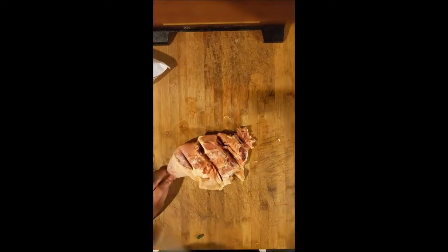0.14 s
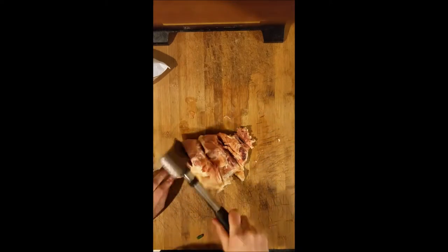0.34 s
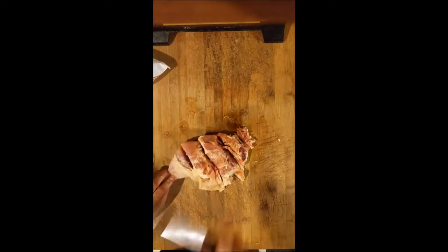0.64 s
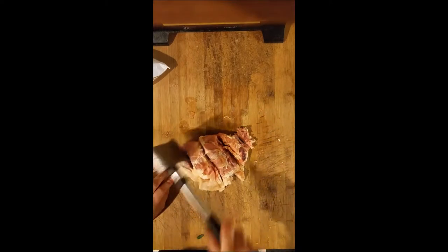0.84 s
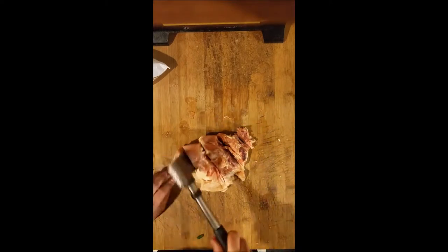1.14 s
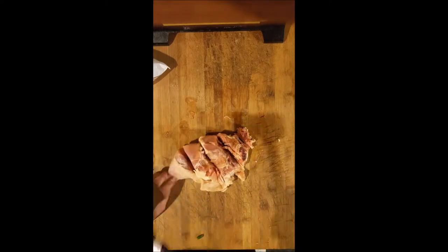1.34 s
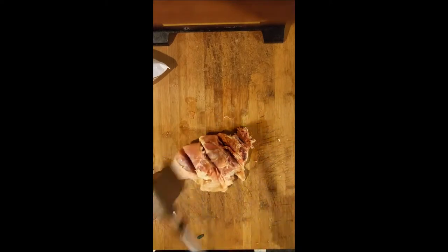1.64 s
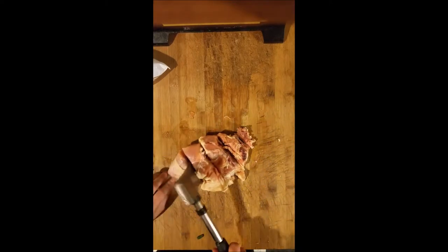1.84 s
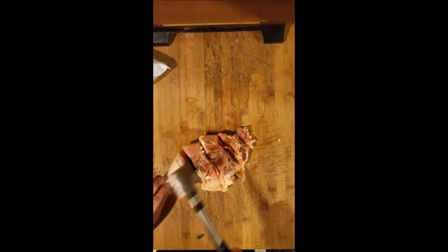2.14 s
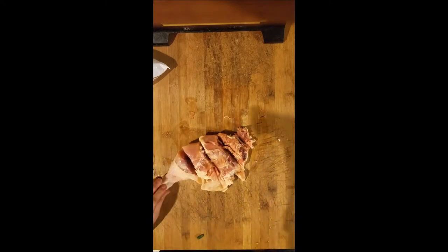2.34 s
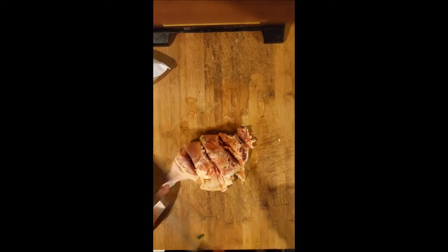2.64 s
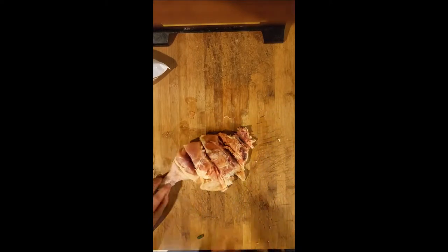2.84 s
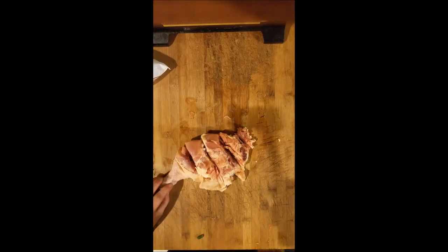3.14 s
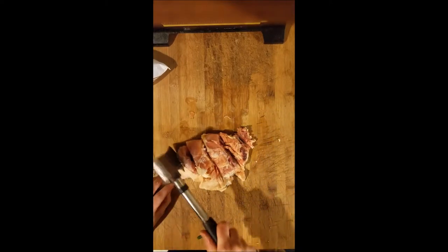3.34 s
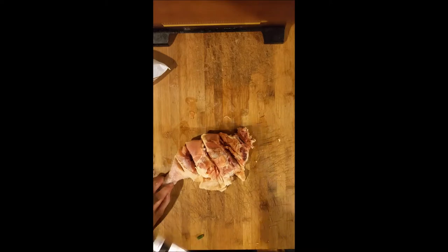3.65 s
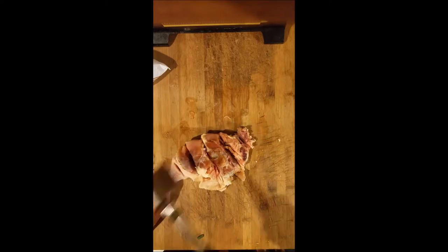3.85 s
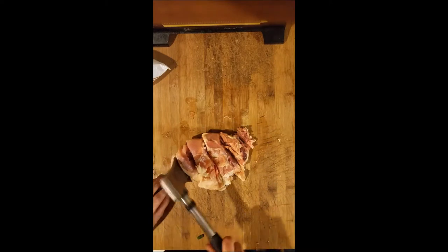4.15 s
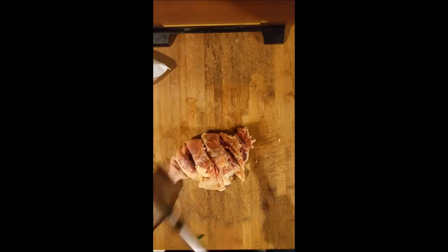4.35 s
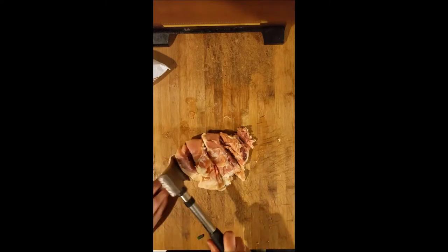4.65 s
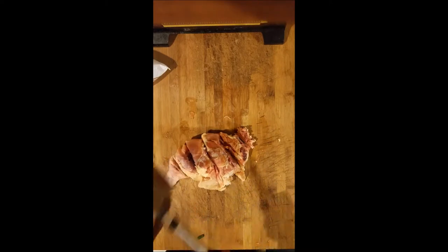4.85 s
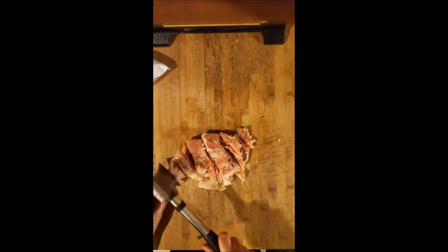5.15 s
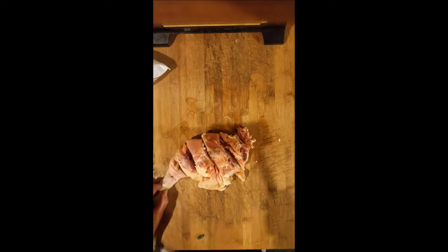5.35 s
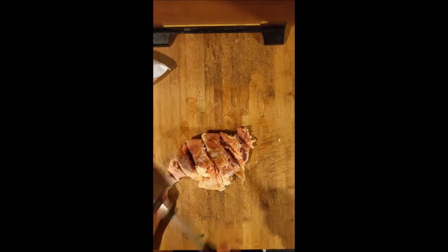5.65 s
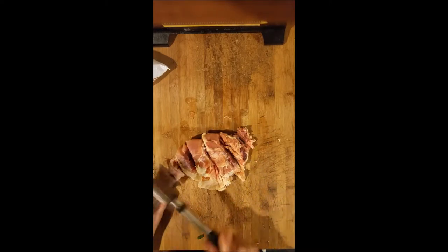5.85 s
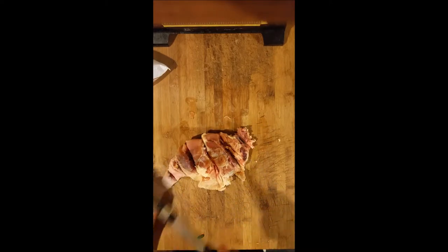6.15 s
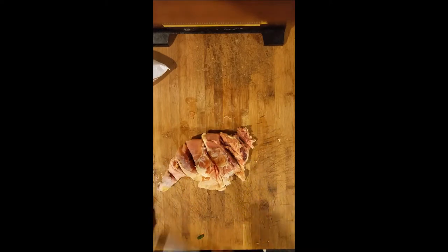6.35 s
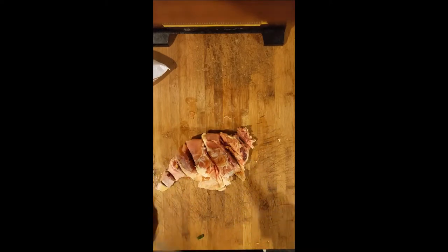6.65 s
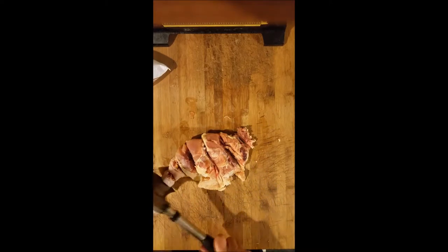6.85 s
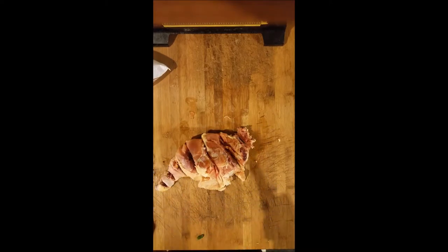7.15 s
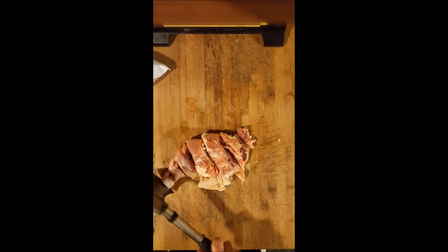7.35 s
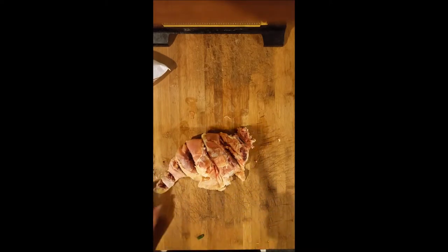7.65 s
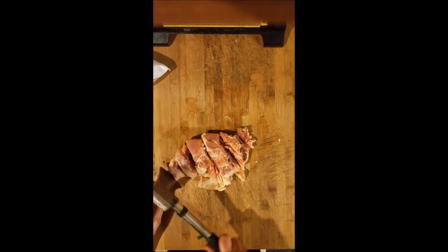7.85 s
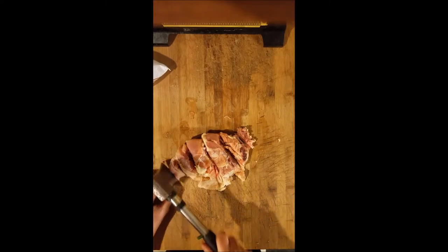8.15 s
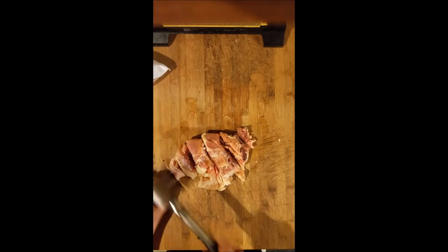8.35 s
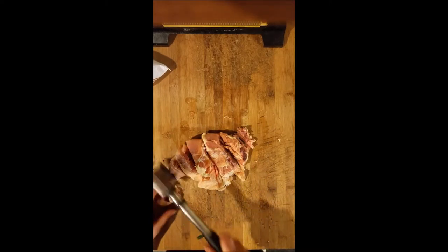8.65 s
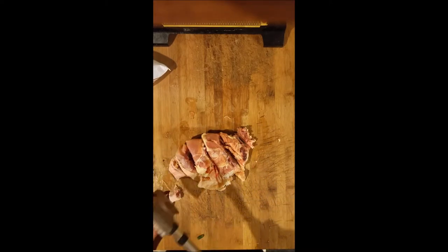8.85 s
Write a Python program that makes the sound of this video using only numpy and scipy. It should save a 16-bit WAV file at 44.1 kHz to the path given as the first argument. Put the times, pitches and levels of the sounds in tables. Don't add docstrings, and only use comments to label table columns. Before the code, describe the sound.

Close stereo pickup in a small, lively kitchen. The tail of one chop dies away, then eighteen uneven chops follow through flesh and bone on a butcher block: solid mid-low wooden thunks, steel slap, occasional sharp bone crack, sticky flesh noise. The block rocks softly between some blows and meat slides faintly. The chopping stops just before eight seconds, leaving tiny ticks, three short edge scrapes and a soft hum.

```python
import sys
import numpy as np
from scipy import signal
from scipy.fft import rfft, irfft, next_fast_len
from scipy.io import wavfile
from scipy.ndimage import uniform_filter1d

SR = 44100
rng = np.random.default_rng(int(sys.argv[2]) if len(sys.argv) > 2 else 0)


def volts_from_decibels(level):
    exponent = np.asarray(level, float) / 20
    return 10 ** exponent


def store_pcm(level_fs):
    pcm = np.round(np.clip(level_fs, -1, 1) * 32767).astype(np.int16)
    wavfile.write(sys.argv[1], SR, np.atleast_2d(pcm).T)


N = 397339
PAD = SR // 10
EDGES_HZ = 30 * 2 ** np.arange(0, 9.6, .5)
BALANCE_DB = np.array([[-.7], [.7]])

# t/s, block level/dB, upper body rel/dB, slap rel/dB, crunch length/ms
BLOWS = [(-0.048, -12.5, -4.5, -19, 1.9), (0.344, -7.5, 0, -17.5, 4), (0.724, -2, -6.5, -31.5, 9),
         (1.114, -43, 4.5, -1.5, 5.3), (1.495, -2.5, -6, -34, 12.5), (1.863, -6, -3.5, -41, 6.1),
         (2.531, -17, -2.5, -18, 40), (2.905, -7.5, -0.5, -12.5, 4), (3.287, -0.5, -1, -31.5, 7.6),
         (3.744, -14.5, 0.5, -17.5, 5.1), (4.119, -6, -1.5, -22, 3.9), (4.525, -4, 0, -24, 9.4),
         (5.088, -25.5, -0.5, -15.5, 7), (5.507, -8.5, -1.5, -22.5, 6.1), (5.863, -5.5, -1.5, -24, 5.3),
         (6.416, -26.5, 1.5, -16.5, 2.7), (6.857, -10.5, 0, -20.5, 14.6), (7.323, -9.5, 6, -32.5, 8.4),
         (7.829, -9.5, 3, -35, 2.9)]
# t/s, bone crack level/dB, counter thump level/dB, grinding rel/dB
CUTS = [(-.065, -53, -31.5, -11), (0.3401, -12, -23.5, -7), (0.7213, -23, -28, -9),
        (1.1099, -50, -50, -1.5), (1.4914, -48.5, -30, -14), (1.8577, -43, -35, -13.5),
        (2.5223, -39, -31.5, 0.5), (2.9052, -30, -23, -4.5), (3.2828, -44.5, -25.5, -10),
        (3.7398, -20, -30.5, -12.5), (4.1083, -13.5, -23.5, -12.5), (4.5247, -32.5, -28, -6.5),
        (5.0857, -28.5, -34, -0.5), (5.4955, -36, -24, 1.5), (5.8623, -22.5, -27.5, -7.5),
        (6.4137, -26.5, -42, -6.5), (6.8533, -22, -23.5, 2), (7.322, -27, -26, -1),
        (7.8258, -37, -31, -11.5)]
# f/Hz, level/dB, t60/s
BLOCK_LOW = [(384.8, -20, 0.015), (515.5, 0, 0.041), (549.5, -1.5, 0.041), (622.4, -5, 0.028),
             (577.7, -0.5, 0.048), (722, -2.5, 0.031), (725, -8.5, 0.032), (829.7, 3, 0.03)]
BLOCK_HIGH = [(958, -9.5, 0.047), (1165, 11.5, 0.0071), (1060, -6.5, 0.036), (1238, -8, 0.029),
              (1635, 1, 0.03), (1627, -3.5, 0.034), (1751, 1.5, 0.016), (2080, 1.5, 0.011),
              (2137, -7.5, 0.017), (2354, -3, 0.0061), (3016, 0, 0.0022)]
# f/Hz, density/dB per Hz
KNOCK_COLOUR = [(500, -30), (1300, -8), (2400, -1), (3300, 1), (4500, -4), (6400, -11), (9000, -22),
                (16000, -26)]
# f/Hz, density/dB per Hz
CRACK_COLOUR = [(300, -12), (1000, 2), (3500, 1), (6400, 0), (9500, -4), (12500, -3), (16000, -3)]
# f/Hz, level/dB, t60/s
COUNTER = [(66, -6.5, 0.51), (97.5, 4.5, 0.26), (162.4, 5.5, 0.15), (193.7, -3.5, 0.24), (270.6, 7, 0.025),
           (334, -10.5, 0.093)]
# t/s, hold/s, level/dB
SQUELCHES = [(0.0, 0.052, -59), (.35, 0.078, -44.5), (.73, 0.045, -40.5), (1.12, 0.026, -59),
             (1.5, .12, -52), (1.87, 0.034, -47.5), (2.54, .07, -48.5), (2.91, 0.11, -48.5),
             (3.29, 0.073, -40), (3.75, 0.025, -44), (4.125, 0.062, -43), (4.53, 0.066, -41.5),
             (5.09, 0.082, -51.5), (5.51, .08, -42.5), (5.87, 0.038, -36.5), (6.42, .04, -57),
             (6.86, 0.067, -43), (7.33, 0.058, -42.5), (7.835, 0.052, -46)]
# f/Hz, density/dB per Hz
SQUELCH_COLOUR = [(1200, -28), (2600, -4.5), (4000, -4), (8000, -15), (12500, -16), (16000, -14)]
# f/Hz, level/dB, t60/s
HEAD_LOW = [(2143, -8, .2)]
HEAD_HIGH = [(12320, -1, .13)]
# t/s, ring level/dB
LOW_RINGS = [(0.7218, -31), (2.9038, -26.5), (3.2854, -29), (3.7414, -41), (5.5034, -11.5), (5.8626, -18),
             (6.8553, -20.5), (7.8274, -34.5)]
HIGH_RINGS = [(0.7324, -49), (3.2929, -46), (5.8751, -44)]
# t/s, peak level/dB, length/ms
TICKS = [(0.1716, -62, 4), (0.2553, -59, 4.8), (0.297, -44.5, 2.2), (0.5994, -49.5, 2.1),
         (1.1137, -27.5, 3.5), (1.4847, -30, 1.2), (1.7274, -59, 2.5), (1.8544, -38, 4.7),
         (2.3316, -42, 1.3), (2.516, -27, 5.6), (2.9464, -35, 1.7), (3.2771, -24, 3.9),
         (3.9609, -50.5, 0.82), (4.1464, -28.5, 3.7), (4.3194, -32, 1.6), (4.502, -39, 2.1),
         (4.8818, -38.5, 2.1), (5.2402, -30, 3.2), (5.5464, -22, 1.6), (5.557, -14.5, 2.1),
         (5.5775, -26, 4.6), (6.6662, -40, 1.2), (7.3123, -23, 2.1), (7.3534, -51, 1.7), (7.38, -19, 1.1),
         (7.6003, -61, 0.67), (8.1952, -32.5, 2.1), (8.5834, -34, 0.95)]
# t/s, hold/s, level/dB
SLIDES = [(0.17, 0.086, -60), (0.58, 0.25, -61), (1.405, 0.0834, -68.5), (2.335, 0.011, -53),
          (2.72, 0.11, -66), (3.965, 0.017, -48.5), (4.3, 0.22, -64), (4.89, 0.0091, -57.5),
          (5.3, 0.22, -72), (6.36, 0.013, -67.5), (6.67, 0.064, -68.5), (7.1, 0.17, -66.5), (7.6, 0.1, -80),
          (8.15, 0.6, -74), (8.92, 0.057, -70)]
# f/Hz, density/dB per Hz
SLIDE_COLOUR = [(530, -39.5), (1360, -20.5), (1510, 3.5), (1660, -18.5), (1830, -3), (2830, -6),
                (8500, -24), (16000, -22.5)]
# t/s, hold/s, level/dB
SCRAPES = [
    (8.235, 0.019, -57.5),
    (8.35, 0.076, -54),
    (8.53, 0.083, -56),
]
# f/Hz, width/Hz, level/dB
EDGE_MODES = [(660, 140, 17), (1655, 150, 22.5), (3650, 480, 11.5), (5190, 540, 1), (9580, 150, 6.5)]
# t/s, peak level/dB, f/Hz, length/ms
ROCKS = [(1.299, -62, 190, 54), (1.401, -64, 186, 22), (3.961, -37, 198.4, 46), (3.994, -50, 204, 30),
         (4.036, -37.5, 187.4, 20), (4.079, -35.5, 193, 28), (4.899, -61.5, 257, 13), (8.278, -48, 185, 14),
         (8.414, -44.5, 178, 9.6), (8.544, -52, 176, 14), (4.009, -44, 581, 23), (4.081, -35.5, 530, 21)]
# t/s, hold/s, level/dB
STIRRING = [(2.7, 0.155, -52), (5.3, .2, -58), (6.5, 0.53, -64.5), (7.1, 0.18, -54.5), (8.0, 1.1, -63)]
# f/Hz, density/dB per Hz
TONE_COLOUR = [(18, -35), (30, -7), (201, -13), (332, -23.5), (562, -10), (625, -15.5), (752, -13),
               (858, -18), (928, -15.5), (2280, -21), (4770, -43.5), (15200, -43), (16500, -54.5)]
# f/Hz, t60/s, level/dB
KITCHEN = [(51, 0.26, -11), (121, 0.32, 5.5), (382, 0.4, 3.5), (990, 0.48, -2), (2340, 0.37, 6.5),
           (6770, 0.48, 8), (15100, 0.13, 16)]
# f/Hz, correlation/1
LIKENESS = [(60, 1), (250, 0.58), (600, 0.59), (1200, -0.35), (3000, 0.23), (12000, -1)]
# f/Hz, lag/samples
RIGHT_LAG = [(100, 8), (520, 12), (1000, 12), (1460, 16), (2200, 21), (16000, 20)]
# delay/ms, level/dB
SURFACES = [
    [(1.3, -33), (3.1, -13)],
    [(.9, -15), (4.2, -13)],
]


def at_hz(points, hz, column=1):
    points = np.array(points)
    return np.interp(np.log(hz), np.log(points[:, 0]), points[:, column])


def add(track, s, sound):
    i = round(s * SR) + PAD
    track[..., i:i + sound.shape[-1]] += sound[..., :N + PAD - i]


def drift(knots_rate):
    knots = rng.standard_normal(int(knots_rate * 10) + 2)
    return np.interp(np.linspace(0, len(knots) - 1, N + PAD), np.arange(len(knots)), knots)


def ring(x, hz, t60_s):
    r = volts_from_decibels(-60 / (t60_s * SR))
    w = 2 * np.pi * hz / SR
    return signal.lfilter([0, np.sin(w)], [1, -2 * r * np.cos(w), r * r], x + 1e-18)


def body(forces, modes, vary_db):
    out = 0
    luck = rng.standard_normal((len(forces), len(modes)))
    for k, (hz, mode_db, t60_s) in enumerate(modes):
        track = np.zeros(N + PAD)
        for (s, force), chance in zip(forces, luck[:, k]):
            add(track, s, force * volts_from_decibels(mode_db + vary_db * chance))
        out = out + (-1) ** k * ring(track, hz, t60_s)
    return out


def crunch(ms, rise_ms, spread_db):
    t_ms = np.arange(4096) / SR * 1000
    burst = rng.standard_normal(4096) * volts_from_decibels(spread_db * rng.exponential(1, 4096))
    sizes = np.abs(burst) * (1 - np.exp(-t_ms / rise_ms)) * np.exp(-t_ms / np.clip(ms, .3, 30))
    for _ in range(5):
        phase = np.angle(rfft(sizes * np.sign(burst)))
        burst = sizes * np.sign(irfft(np.exp(1j * phase)))
    return burst / np.sqrt(np.sum(burst ** 2))


def coloured(x, spectrum):
    log_gain = np.log(volts_from_decibels(at_hz(spectrum, np.arange(1025) * SR / 2048 + 1)))
    cepstrum = irfft(log_gain)
    cepstrum[1:1024] *= 2
    cepstrum[1025:] = 0
    kernel = irfft(np.exp(rfft(cepstrum)))[:512]
    return signal.fftconvolve(x, kernel / np.sqrt(np.sum(kernel ** 2)))[:len(x)]


def strokes(rows, rise_db_per_s, fall_db_per_s):
    out = np.zeros(N + PAD)
    for s, hold_s, db in rows:
        t = np.arange(-PAD, 3 * PAD + max(hold_s, 0) * SR) / SR
        rise_db = rise_db_per_s * np.maximum(-t, 0)
        fall_db = fall_db_per_s * np.maximum(t - hold_s, 0)
        add(out, max(s - PAD / SR, -PAD / SR), volts_from_decibels(db - rise_db - fall_db))
    return out


def bands(gain, count):
    out = 0
    white = rng.standard_normal((2, 2, count))
    for k, (low, high) in enumerate(zip(EDGES_HZ, EDGES_HZ[1:])):
        band = signal.butter(2, [low, high], "band", fs=SR, output="sos")
        mid, side = signal.sosfilt(band, white[k % 2])
        hz = np.sqrt(low * high)
        c = np.clip(at_hz(LIKENESS, hz), -1, 1)
        out = out + gain(hz) * (np.sqrt(1 + c) * mid + np.sqrt(1 - c) * side * [[1], [-1]])
    return out / np.sqrt(np.mean(out ** 2))


def blows():
    jolt = 0.54
    low, high, knock = [], [], np.zeros(N + PAD)
    for (s, db, high_db, slap_db, ms), (*_, grind_db) in zip(BLOWS, CUTS):
        grind = volts_from_decibels(grind_db) * crunch(24, 10, spread_db=1.5)
        force = crunch(ms, 2.0, spread_db=3.0) + grind
        stop = grind.copy()
        stop[90] += jolt
        touch = volts_from_decibels(db - 18.5) * crunch(16.0, 4.2, spread_db=-1.5)
        low += [(s - .002, stop * volts_from_decibels(db + 4.5)), (s - .008, touch)]
        high += [(s - .002, force * volts_from_decibels(db + high_db - 2.0)), (s - .008, touch * volts_from_decibels(high_db))]
        add(knock, s - .002, force * volts_from_decibels(db + slap_db + 22.5))
    lowpass = signal.butter(2, 750, fs=SR, output="sos")
    soft = signal.sosfilt(lowpass, body(low, BLOCK_LOW, vary_db=1.5))
    return soft + body(high, BLOCK_HIGH, vary_db=4.0) + coloured(knock, KNOCK_COLOUR)


def crack():
    out = np.zeros(N + PAD)
    for s, crack_db, *_ in CUTS:
        add(out, s - .002, crunch(3.6, 14.0, spread_db=-4.0) * volts_from_decibels(crack_db + 14))
    return coloured(out, CRACK_COLOUR)


def thump():
    push = np.hanning(200)
    push /= push.sum()
    pushes = [(s, push * volts_from_decibels(thump_db + 3.5)) for s, _, thump_db, _ in CUTS]
    return body(pushes, COUNTER, vary_db=2.0)


def squelch():
    spikes = np.minimum(rng.exponential(1, N + PAD), 6)
    grains = rng.standard_normal((2, N + PAD)) * volts_from_decibels(2.2 * spikes + 1.8 * drift(170))
    wet = np.array([coloured(g, SQUELCH_COLOUR) for g in grains / grains.std()])
    return wet * strokes(SQUELCHES, rise_db_per_s=3007.5, fall_db_per_s=350)


def head():
    free_after_s = .035
    low = [(s + free_after_s, volts_from_decibels(np.array([db]))) for s, db in LOW_RINGS]
    high = [(s, volts_from_decibels(np.array([db]))) for s, db in HIGH_RINGS]
    return body(low, HEAD_LOW, vary_db=-7) + body(high, HEAD_HIGH, vary_db=1.5)


def ticks():
    tick_hz = 3270
    out = np.zeros(N + PAD)
    for s, db, ms in TICKS:
        add(out, s, volts_from_decibels(db + 4.5) * crunch(ms, 0.32, spread_db=-12.0))
    bright = signal.butter(2, .6 * tick_hz, "high", fs=SR, output="sos")
    return signal.sosfilt(bright, out + .5 * ring(out, tick_hz, 5 / tick_hz))


def friction():
    grains = rng.standard_normal(N + PAD) * volts_from_decibels(0.28 * rng.exponential(1, N + PAD) + 0.97 * drift(120))
    grains /= grains.std()
    wet = coloured(grains, SLIDE_COLOUR) * strokes(SLIDES, rise_db_per_s=685.5, fall_db_per_s=355)
    edge = sum(volts_from_decibels(db) * np.sqrt(width) * ring(grains, hz, 1.25 / width) for hz, width, db in EDGE_MODES)
    scrape = edge / edge.std() * strokes(SCRAPES, rise_db_per_s=804, fall_db_per_s=457)
    return volts_from_decibels(-1.5) * wet + scrape


def rocks():
    out = np.zeros(N + PAD)
    for s, db, hz, ms in ROCKS:
        t = np.arange(int(ms * SR / 1000 * 1.8)) / SR
        swell = np.sin(np.pi * t / t[-1])
        add(out, s - .006, volts_from_decibels(db) * swell * np.sin(2 * np.pi * hz * t))
    return out


def kitchen(x):
    t = np.arange(SR) / SR
    tail = bands(lambda hz: volts_from_decibels(at_hz(KITCHEN, hz, column=2) - 60 * t / at_hz(KITCHEN, hz)), SR)
    tail *= np.clip((t - .003) / 0.0014, 0, 1)
    return signal.fftconvolve(x[None], tail / np.sqrt(SR), axes=1)[:, :N + PAD]


def tone():
    rest_db, glow_db, glow_fall_db_per_s = -68.5, -37.5, 60.5
    kicks = np.zeros(N + PAD)
    for s, db, *_ in BLOWS:
        kick_db = glow_db + .9 * min(db, -8)
        add(kicks, s, volts_from_decibels(np.array([kick_db])))
    glow = signal.lfilter([1], [1, -volts_from_decibels(-glow_fall_db_per_s / SR)], kicks)
    level = np.hypot(volts_from_decibels(rest_db) + strokes(STIRRING, 210, 250), glow)
    together = drift(9.7)

    def gain(hz):
        return volts_from_decibels(at_hz(TONE_COLOUR, hz) + 1.2 * together + 0.5 * drift(6.5))
    return level * bands(gain, N + PAD)


def ports(x):
    size = next_fast_len(len(x) + 512)
    hz = np.arange(size // 2 + 1) * SR / size + 1e-3
    lags_s = [0, at_hz(RIGHT_LAG, hz) / SR]
    paths = []
    for lag_s, echoes in zip(lags_s, SURFACES):
        bounce = sum(volts_from_decibels(db) * np.exp(-2j * np.pi * hz * ms / 1000) for ms, db in echoes)
        paths.append(np.exp(-2j * np.pi * hz * lag_s) * (1 + bounce))
    return irfft(rfft(x, size) * np.array(paths), size)[:, :len(x)]


def scene():
    wide = blows() + thump() + head() + rocks() + friction()
    beamed = crack() + ticks()
    room = kitchen(volts_from_decibels(3.5) * wide + volts_from_decibels(-13.5) * beamed)
    mix = ports(wide + beamed) + room + tone() + squelch()
    return (mix * volts_from_decibels(BALANCE_DB))[:, PAD:]


def band_limit(x):
    return signal.sosfilt(signal.butter(12, 16660, fs=SR, output="sos"), x)


def record(dry):
    hiss_db, top_hz, release_db_per_s = -85, 16100, 2000
    dry = dry + volts_from_decibels(hiss_db) * signal.lfilter([1, -.8], [1], rng.standard_normal(dry.shape))
    dry = signal.sosfilt(signal.butter(2, 58, "high", fs=SR, output="sos"), dry)
    over_db = np.maximum(20 * np.log10(np.abs(dry).max(0) + 1e-9), 0)
    fall_db = release_db_per_s * np.arange(N) / SR
    held_db = np.maximum.accumulate(over_db + fall_db) - fall_db
    held_db = uniform_filter1d(np.roll(held_db, -30), size=44)
    limited = np.clip(dry * volts_from_decibels(-held_db), -1, 1)
    lowpass = signal.cheby2(10, 50, top_hz + 500, fs=SR, output="sos")
    return band_limit(signal.sosfilt(lowpass, limited))


dry = scene()
out = record(dry)
store_pcm(out)
```